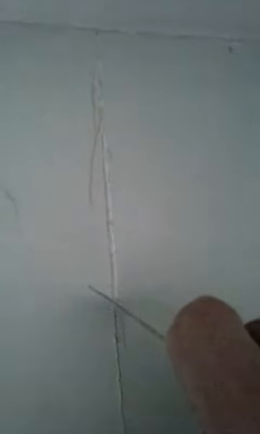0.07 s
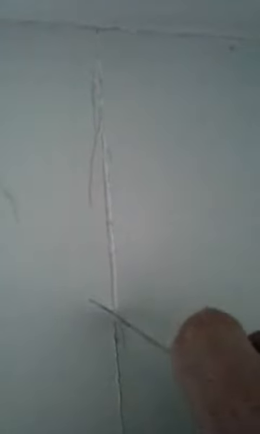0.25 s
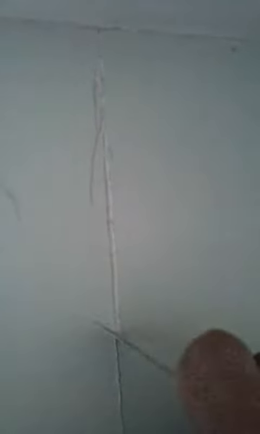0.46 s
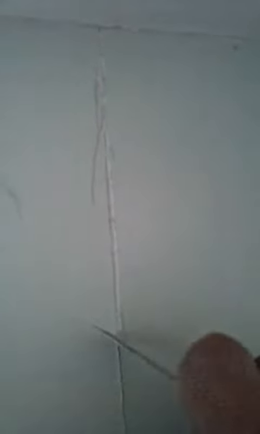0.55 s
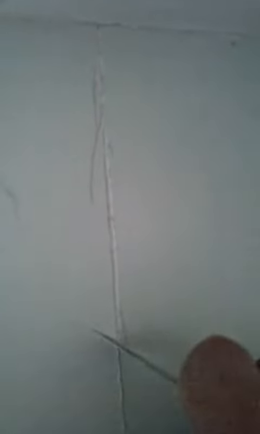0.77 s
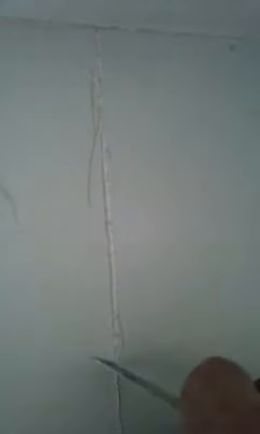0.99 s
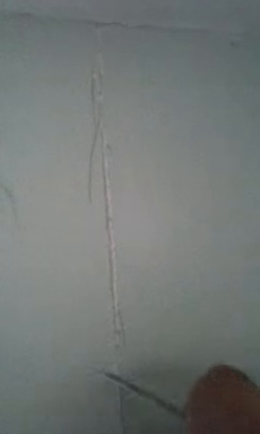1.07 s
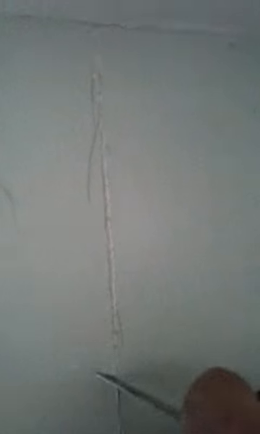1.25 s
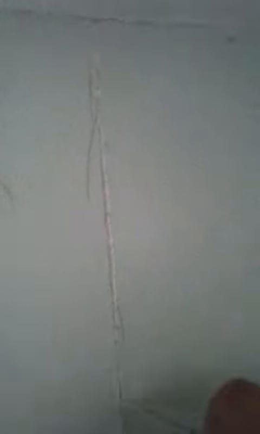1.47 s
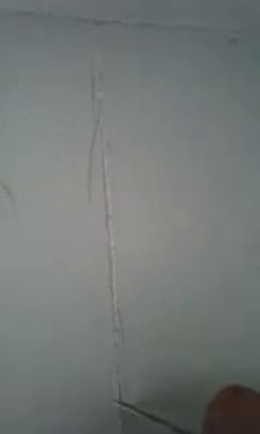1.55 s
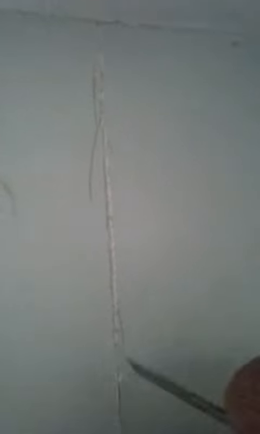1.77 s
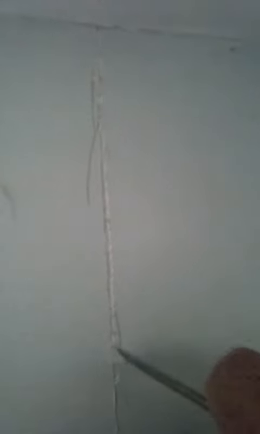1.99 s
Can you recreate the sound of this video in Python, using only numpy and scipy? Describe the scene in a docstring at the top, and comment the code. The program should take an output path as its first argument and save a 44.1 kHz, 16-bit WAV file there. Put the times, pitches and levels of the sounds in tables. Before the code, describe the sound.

A metal putty knife scrapes along a plaster crack. Small gritty clicks at 0.16-0.25 s lead to loud, distorted snaps around 0.43-0.46, 0.58, 0.75, 0.96 and 1.12-1.17 s, with brief blade ring, low wall booms and bare-room echo. A light raspy drag comes near 1.47-1.55 s, then faint ticks at 1.7 and 1.86 s. Soft flickering hiss runs beneath, with faint hollow noise later.

```python
"""A bare room, close to a plaster wall: a steel putty knife is forced down a crack, a small microphone near it.
The blade sticks and breaks free in short gritty snaps: shaped noise bursts plus damped blade modes, overloaded.
The wall booms with a sagging sine and shuddering noise; echoes and a noise tail answer from the room.
Light drags are rasping noise, the strongest as the blade leaves the crack near the end; faint ticks follow.
Flickering hiss lies beneath, and a faint hollow noise comes up later."""
import sys
import numpy as np
from scipy import signal
from scipy.fft import rfft, irfft
from scipy.io import wavfile
from scipy.ndimage import uniform_filter1d

SR = 44100
rng = np.random.default_rng(int(sys.argv[2]) if len(sys.argv) > 2 else 0)


def int16_out(signal):
    """Quantize to a 16-bit WAV file."""
    q = np.round(np.clip(np.atleast_2d(signal).T, -1, 1) * 32767)
    wavfile.write(sys.argv[1], SR, q.astype(np.int16))


N = 88200  # two seconds

# Relative colour of the microphone hiss and room rumble: [f/Hz, level/dB]
HISS_COLOUR = [(18, -47), (30, -2.5), (115, -2.5), (252, -14.5), (319, -12), (499, -18.5), (584, -27),
               (721, -18.5), (2350, -25), (2750, -23.5), (4780, -33.5), (6720, -17), (8080, 3),
               (12600, -9.5), (16000, -17)]
HISS_DB, HISS_FLICKER_DB = -51.5, 4
# Relative colour of the faint hollow background: [f/Hz, level/dB]
HOLLOW_COLOUR = [(40, -19.5), (110, 8.5), (220, -6.5), (380, 2), (600, -18), (900, 0.5), (1150, -10),
                 (1400, -19.5), (2000, -13), (4000, -25), (16000, -29.5)]
# Its loudness over time: [t/s, level/dB]
HOLLOW_FADER = [(0, -104), (.4, -76), (1.4, -47.5), (1.7, -55.5), (2, -61)]

# Colour of the room's tail: [f/Hz, level/dB]
TAIL_COLOUR = [(30, -22), (70, -5), (130, 2.5), (220, -4), (420, -5.5), (600, -6), (1100, -1.5),
               (1750, -3.5), (2150, -8), (2380, 1.5), (2650, -8), (3200, -4.5), (4200, -8), (5500, -0.5),
               (6800, -9), (8200, -9.5), (11000, -8), (16000, -18)]
# Decay of the room, before a last taper: [f/Hz, t60/s]
ROOM_DECAY = [(100, 0.23), (300, 0.59), (900, 0.51), (2400, 0.53), (5000, 0.48), (8200, 0.41),
              (14000, 0.41)]
TAIL_START_S, TAIL_BUILD_S = 0.0076, 0.022

# Early reflections from the nearest surfaces: [delay/s, level/dB]
REFLECTIONS = [(.0075, -19), (0.0132, -13), (.0155, -24.5), (.0205, -26.5)]
# Their shared colour: [f/Hz, level/dB]
REFLECTION_COLOUR = [(100, -11), (1200, 3), (2350, 4), (3200, -9.5), (5500, -5), (8500, -3), (11000, -1),
                     (16000, -10)]

# Low booms of the wall as the pressure lets go: [t/s, lowest note level/dB, shudder level/dB]
WALL_BOOMS = [(.24, -41, -51), (0.444, -32.5, -34.5), (0.584, -54, -33), (.755, -46, -47.5),
              (.955, -35, -33), (1.163, -28.5, -26), (1.509, -37, -48)]
# The note starts BOOM_SAG_HZ above BOOM_HZ and settles down to it
BOOM_HZ, BOOM_SAG_HZ, BOOM_SETTLE_S = 98.8, 71, 0.016
BOOM_RISE_S, BOOM_T60_S = 0.03, 0.22
# Relative colour of the wall's shudder: [f/Hz, level/dB]
SHUDDER_COLOUR = [(30, -15), (70, -7.5), (160, 1), (200, 5), (260, -7.5), (340, -5.5), (440, 0),
                  (520, -20.5), (800, -13.5), (1500, -23.5), (8000, -73.5)]
SHUDDER_RISE_S, SHUDDER_T60_S = 0.039, 0.27

# Light drags of the edge: [t/s, length/s, level/dB]
EDGE_DRAGS = [(0.409, 0.061, -41), (0.884, 0.034, -40.5), (1.469, 0.062, -31)]
DRAG_RISE_S, DRAG_FADE_S = 0.02, 0.016
DRAG_GRIT_DB, DRAG_ROOM_DB = 0, -12
# Relative colour of the dragging edge: [f/Hz, level/dB]
RASP_COLOUR = [(60, -13), (330, 3.5), (600, -9), (1600, -6.5), (2550, -8), (2850, 10), (3150, 6.5),
               (3500, -5.5), (5500, -16), (7200, -4.5), (8300, 5.5), (10500, -15.5), (16000, -14)]

# Ringing of the blade; longer decays are cut to LONGEST_RING_S: [f/Hz, relative level/dB, t60/s]
BLADE_MODES = [(1580, -28, .016), (1824, -13.5, 0.0083), (2576, -10.5, 0.047), (3118, -10.5, 0.0062),
               (4098, -8.5, 0.027), (5454, -5.5, .012), (6350, -5.5, 0.0059)]
RING_SPREAD_OCT, LONGEST_RING_S, RING_ROOM_DB = 0.41, 0.02, -11

# Snaps of the blade through plaster; the room send is relative to the snap's own level:
# [t/s, length/s, level/dB, wall knock/dB, treble/dB, blade ring/dB, centre of the ring f/Hz, room send/dB]
PLASTER_SNAPS = [(0.16, .008, -48, -6, 7, 3, 3300, 19), (0.1799, 0.0043, -29.5, 20, 8, 2, 3100, 6),
                 (.184, 0.0062, -20, 4, 2, 4, 3200, 4.5), (.229, 0.0023, -15, 11, 5, 3.5, 3100, -2.5),
                 (0.2431, 0.0036, -18, 16.5, -8, 0.5, 2700, 0),
                 (0.373, 0.0013, -41, -14, 8, -19, 6000, -8.5),
                 (0.4285, 0.0081, 2, 3, -0.5, -17, 4300, 0.5),
                 (0.4554, 0.0044, -0.5, 3.5, -4, -3.5, 5700, 2),
                 (0.4603, 0.00074, 2.5, 4.5, 6.5, -22.5, 4200, -5.5),
                 (0.5801, 0.0044, 7, -2, -4, -15.5, 4400, 0), (.5836, 0.0062, -8, -3, 3.5, -4.5, 2500, -5),
                 (0.75, 0.0038, -6.5, 7.5, 1, -2, 5700, -1), (0.904, 0.0035, -27, 5, 7, 4, 3200, 3.5),
                 (0.912, 0.0032, -27, 11, 0.5, 6, 2600, 11.5),
                 (0.935, 0.0048, -14.5, 0.5, 5.5, 5, 3600, -9),
                 (0.9587, 0.0056, 0.5, -8.5, 5, -4, 4200, -3.5),
                 (0.9609, .004, -5, 15.5, -24, 1.5, 2800, 2),
                 (1.1244, 0.0037, -9.5, 3, 11.5, 7, 2500, -3.5),
                 (1.1628, 0.0064, 4.5, 0.5, -2, -15.5, 1900, 1),
                 (1.1686, .003, -13.5, 15, 2.5, 12.5, 2700, 6),
                 (1.485, 0.007, -27, -1, -3.5, 4, 1600, 10.5), (1.696, 0.0014, -47, -13, 1, 1, 5300, 2.5),
                 (1.719, 0.0019, -32, 6, 4, 8, 2060, 1.5),
                 (1.858, 0.00071, -42.5, -14.5, 11, -12, 5300, -8)]
ATTACK_S, RELEASE_S = 0.00029, 0.0011
CRUMB_DB, EASE_DB_PER_S = 2.5, 903
KNOCK_HZ, TREBLE_HZ = 700, 7450  # knock lifts or cuts below, treble above
# Relative colour of breaking plaster: [f/Hz, level/dB]
CRUNCH_COLOUR = [(30, -36), (100, -33), (220, -22.5), (350, -3.5), (520, -14), (800, -8), (1200, -12.5),
                 (1700, -12), (2600, -5.5), (3600, -10.5), (4400, -3.5), (5100, -9), (6800, -1.5),
                 (7500, 3.5), (8200, 9.5), (9000, 1), (10500, -10.5), (13500, -11), (16000, -4)]

EDGE_HZ = 15800  # upper band limit


def amp(db):
    """Turns decibels into gain."""
    return 10 ** (np.asarray(db) / 20)


def unit(x):
    """Scales a sound to rms 1."""
    return x / np.sqrt(np.mean(x ** 2) + 1e-20)


def read(points, hz):
    """Reads a table along a log-frequency axis."""
    f, value = np.transpose(points)
    return np.interp(np.log(hz + 1), np.log(f), value)


def add(mix, s, sound):
    """Mixes a sound in at a time in seconds."""
    part = mix[max(round(s * SR), 0):][:len(sound)]
    part += sound[:len(part)]


def colour(x, points):
    """Equalises a long noise to a table of levels."""
    gain = amp(read(points, np.fft.rfftfreq(len(x), 1 / SR)))
    return irfft(rfft(x) * gain, len(x))


def causal(db, size=4096):
    """Minimum-phase impulse response: the given gains with the energy as early as possible."""
    log_gain = np.log(amp(np.r_[db, db[-2:0:-1]]))
    spectrum = np.exp(np.conj(signal.hilbert(log_gain)))
    return np.fft.ifft(spectrum).real[:size // 2]


def grit(count, spread_db, size=24):
    """Noise whose strength wanders from crumb to crumb; size is the crumb in samples."""
    noise, lumps = rng.standard_normal((2, count))
    crumb_db = spread_db * unit(uniform_filter1d(lumps, size))
    return unit(noise * amp(crumb_db))


def swell(t, rise, t60):
    """Rises softly, then dies away; peaks at 1."""
    shape = (1 - np.exp(-(t / rise) ** 2)) * np.exp(-np.log(1000) * t / t60)
    return shape / shape.max()


def background():
    """Coloured noise twice: flickering hiss, and a faint hollow bed riding its own fader."""
    hiss = amp(HISS_DB) * unit(colour(grit(N, HISS_FLICKER_DB, size=200), HISS_COLOUR))
    level_db = np.interp(np.arange(N) / SR, *np.transpose(HOLLOW_FADER))
    hollow = unit(colour(rng.standard_normal(N), HOLLOW_COLOUR))
    return hiss + amp(level_db) * hollow


def room(x):
    """Dense tail of a bare room: noise that dies at its own rate in each frequency band."""
    t = np.arange(SR) / SR
    hz, frame_t, bands = signal.stft(rng.standard_normal(SR), SR, nperseg=256)
    bands = bands * np.exp(-np.log(1000) * frame_t / read(ROOM_DECAY, hz)[:, None])
    tail = signal.istft(bands, SR, nperseg=256)[1][:SR]
    tail = colour(tail / np.linalg.norm(tail), TAIL_COLOUR)
    tail *= np.clip((t - TAIL_START_S) / TAIL_BUILD_S, 0, 1)
    tail *= np.minimum(np.linspace(10, 0, SR), 1) ** 2  # taper the last tenth to silence
    return signal.fftconvolve(x, tail)[:N]


def slap(x):
    """Delayed, coloured copies: a few reflections from the nearest surfaces."""
    out = np.zeros(N)
    for delay, db in REFLECTIONS:
        add(out, delay, amp(db) * x)
    colour_db = read(REFLECTION_COLOUR, np.fft.rfftfreq(4096, 1 / SR))
    return signal.fftconvolve(out, causal(colour_db))[:N]


def booms():
    """As pressure lets go the wall shudders, and its lowest note sags in pitch, swells and dies."""
    t, out = np.arange(SR // 2) / SR, np.zeros(N)
    turns = np.cumsum(BOOM_HZ + BOOM_SAG_HZ * np.exp(-t / BOOM_SETTLE_S)) / SR
    note = swell(t, BOOM_RISE_S, BOOM_T60_S) * np.sin(2 * np.pi * turns)
    shudder_shape = swell(t, SHUDDER_RISE_S, SHUDDER_T60_S)
    for s, note_db, shudder_db in WALL_BOOMS:
        shudder = shudder_shape * unit(colour(rng.standard_normal(len(t)), SHUDDER_COLOUR))
        add(out, s, amp(note_db) * note + amp(shudder_db) * shudder)
    return out


def drags():
    """The edge rasps over fine grit: coloured noise that follows the force of each drag."""
    t = np.arange(N) / SR
    force = np.zeros(N)
    for s, length, db in EDGE_DRAGS:
        rise = np.clip((t - s) / DRAG_RISE_S, 0, 1)
        fade = np.exp(-np.maximum(t - s - length, 0) / DRAG_FADE_S)
        force += amp(db) * rise * fade
    return force * unit(colour(grit(N, DRAG_GRIT_DB, size=60), RASP_COLOUR))


def blade(centre_hz, t):
    """Short, hand-damped modes; where the edge catches decides which of them ring most."""
    out = np.zeros(len(t))
    for hz, db, t60 in BLADE_MODES:
        decay = np.exp(-np.log(1000) * t / min(t60, LONGEST_RING_S))
        mode = decay * np.sin(2 * np.pi * hz * t)
        octaves_off = np.log2(hz / centre_hz)
        favour = np.exp(-.5 * (octaves_off / RING_SPREAD_OCT) ** 2)
        out += amp(db) * favour * mode / np.linalg.norm(mode)
    return out


def fracture(length, size=2048):
    """A brief burst of crumbling, with its energy spread about evenly over frequency."""
    t = np.arange(size) / SR
    attack = np.minimum(t / ATTACK_S, 1) ** 2
    release = np.exp(-np.maximum(t - length, 0) / RELEASE_S)
    shape = attack * amp(-EASE_DB_PER_S * t) * release
    burst = grit(size, CRUMB_DB) * shape
    # Keep only the phases of the burst, which flattens its spectrum, then hold it to its shape
    even = irfft(np.exp(1j * np.angle(rfft(burst)))) * np.sqrt(shape)
    return even * np.linalg.norm(shape) / np.linalg.norm(even)


def snaps(size=4096):
    """Each fracture knocks the wall and rings the blade; gives the direct sound and the room send."""
    hz, t = np.fft.rfftfreq(size, 1 / SR), np.arange(size // 2) / SR
    crunch_db = read(CRUNCH_COLOUR, hz)
    crunch_db = crunch_db - 10 * np.log10(np.mean(amp(crunch_db) ** 2))  # mean power 1
    low = 1 / (1 + (hz / KNOCK_HZ) ** 2)
    high = 1 - 1 / (1 + (hz / TREBLE_HZ) ** 4)
    direct, send = np.zeros((2, N))
    for s, length, db, knock_db, treble_db, ring_db, centre_hz, room_db in PLASTER_SNAPS:
        plaster = causal(crunch_db + knock_db * low + treble_db * high)
        crunch = signal.fftconvolve(fracture(length), plaster)
        ring = amp(ring_db) * signal.fftconvolve(fracture(length), blade(centre_hz, t))
        add(direct, s, amp(db) * (crunch + ring))
        add(send, s, amp(db + room_db) * (crunch + amp(RING_ROOM_DB) * ring))
    return direct, send


def scene():
    """Balances knife, wall, room and background into one channel."""
    direct, send = snaps()
    rasp = drags()
    knife = direct + rasp
    answer = slap(knife) + room(send + amp(DRAG_ROOM_DB) * rasp)
    return (knife + answer + booms() + background())[None]


def record(dry):
    """The loudest snaps overload the input, rounding their peaks; then the band limit."""
    clipped = dry / (1 + dry ** 4) ** (1 / 4)
    lowpass = signal.firwin(801, EDGE_HZ, window=("kaiser", 9), fs=SR)
    return signal.oaconvolve(clipped, lowpass[None], "same")


dry = scene()
out = record(dry)
int16_out(out)
```